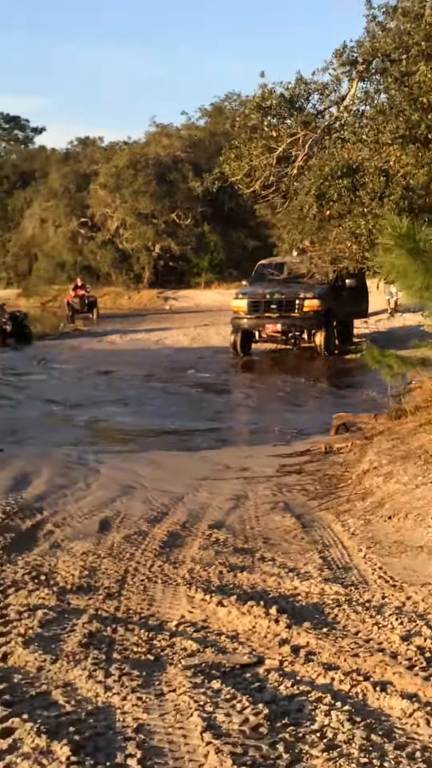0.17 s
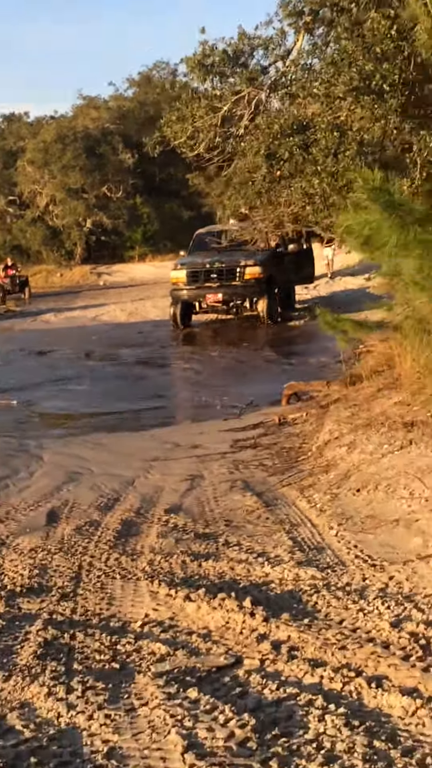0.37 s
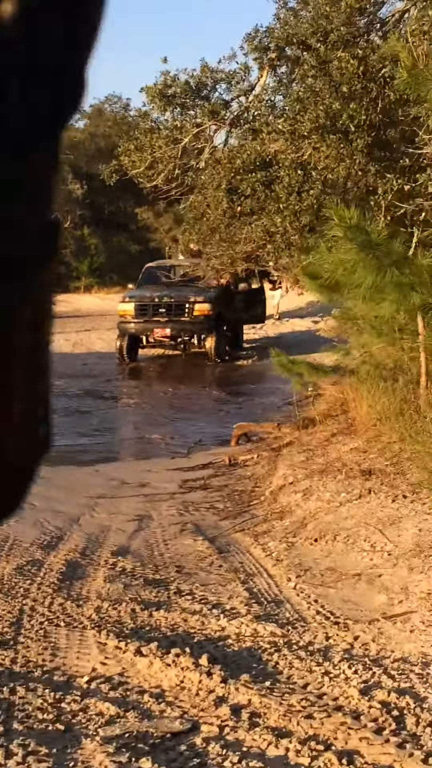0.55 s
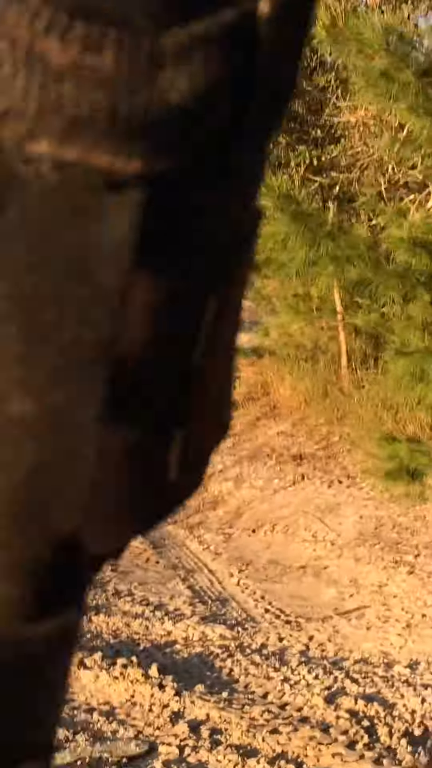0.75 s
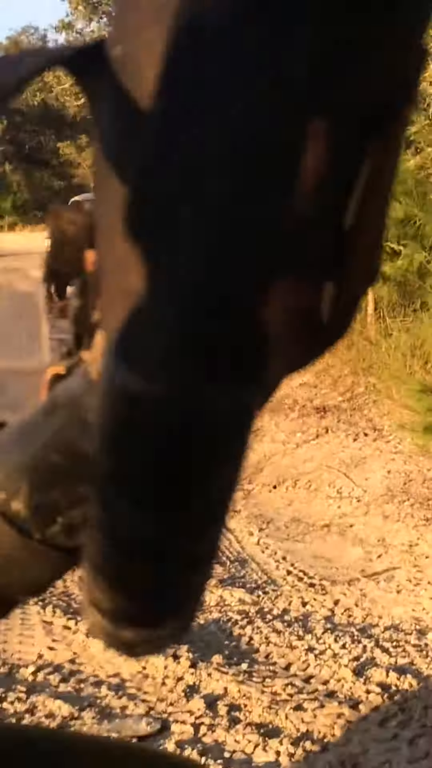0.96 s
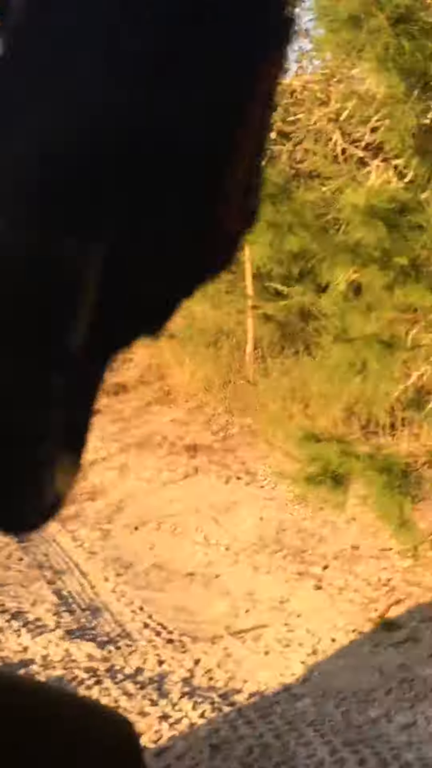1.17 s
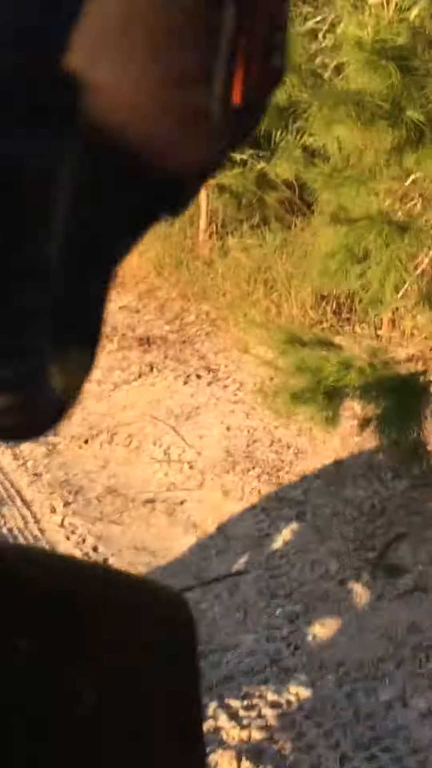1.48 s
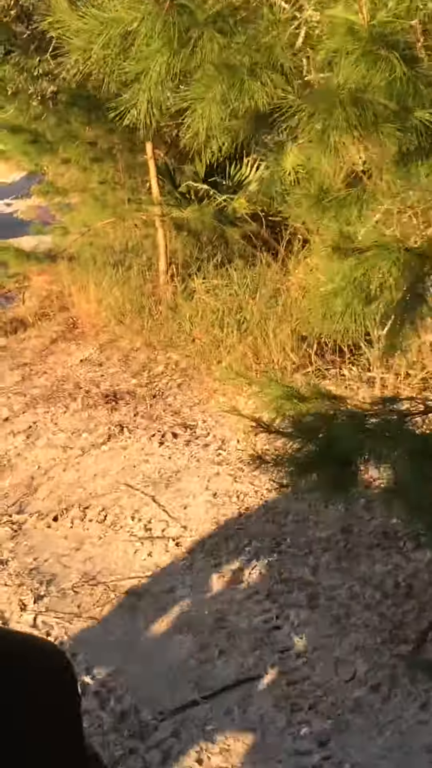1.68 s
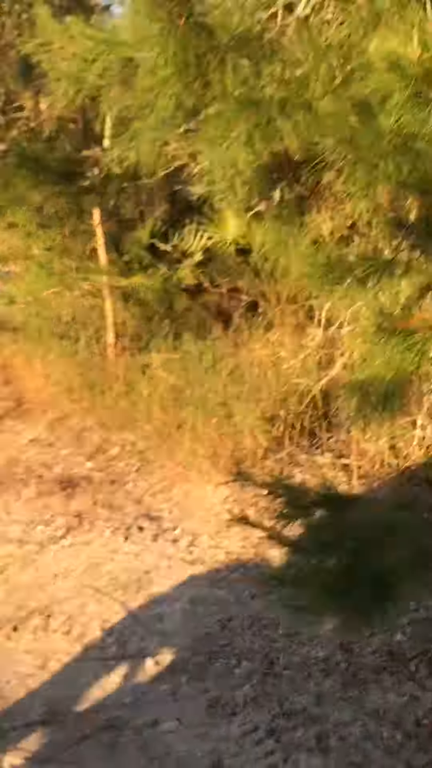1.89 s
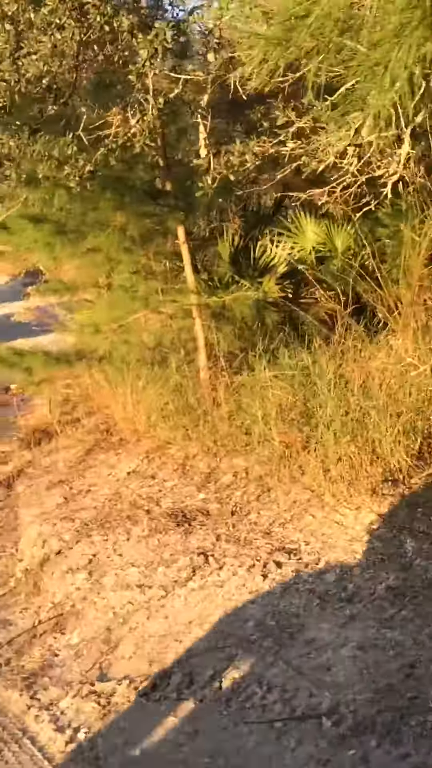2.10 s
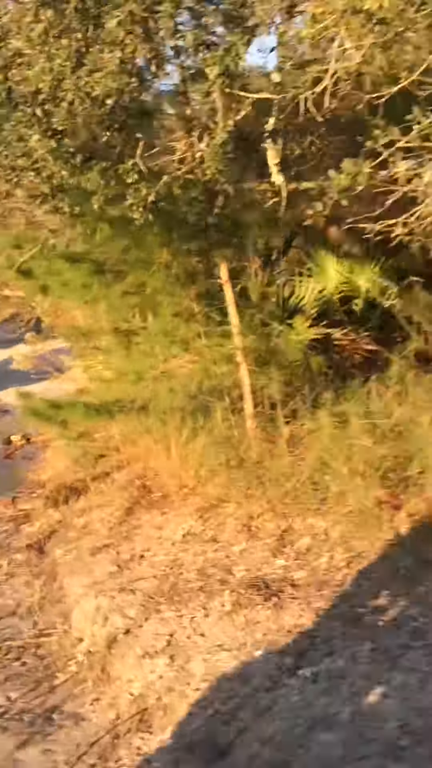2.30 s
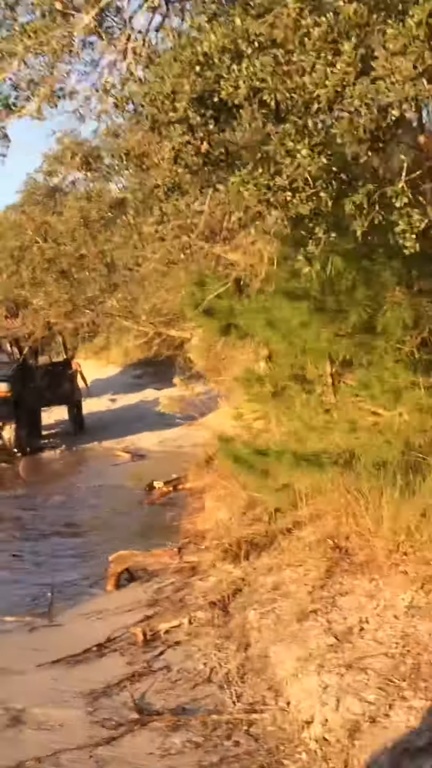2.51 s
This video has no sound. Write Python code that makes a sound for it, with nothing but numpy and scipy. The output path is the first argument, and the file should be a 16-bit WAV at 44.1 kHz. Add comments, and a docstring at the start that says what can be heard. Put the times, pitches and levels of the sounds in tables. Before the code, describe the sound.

A pickup truck engine swells, sags to idle, then revs hard.

```python
"""A muddy water hole, with a V8 pickup working through: two swells of throttle, a sag to idle, a hard rev.
Uneven firings boom in the exhaust pipe and turn raspy under load; a few heavy chugs lead into the rev.
The engine clatters and hisses in step with its cycle, over a low rumble of rolling.
Loose parts near the microphone rattle now and then."""
import sys
import numpy as np
from scipy import signal
from scipy.fft import rfft, irfft, next_fast_len
from scipy.io import wavfile
from scipy.ndimage import uniform_filter1d

SR = 44100
rng = np.random.default_rng(int(sys.argv[2]) if len(sys.argv) > 2 else 0)


def store_pcm(level_fs):
    """Save levels as 16-bit WAV."""
    pcm = np.round(np.clip(level_fs, -1, 1) * 32767).astype(np.int16)
    wavfile.write(sys.argv[1], SR, np.atleast_2d(pcm).T)


N = 116865

# Engine speed. Each row: time in seconds, four-stroke cycles per second.
ENGINE_SPEED = [(0, 28.3), (.1, 27.7), (.296, 23.8), (.482, 22.5), (.712, 18.4), (.828, 17.4), (.902, 18.6),
                (1.07, 26.1), (1.164, 26.9), (1.38, 22.8), (1.52, 21.2), (1.68, 18.2), (1.79, 16.5),
                (1.9, 18.5), (1.98, 29.3), (2.05, 31.2), (2.15, 33.25), (2.306, 33.8), (2.402, 33.7),
                (2.5, 32.5), (2.65, 30.3)]
# Loudness of the engine's rasp. Each row: time in seconds, level in dB.
RASP_LEVEL = [(0, -31), (.2, -35.5), (.45, -35.5), (.72, -40), (.9, -35.5), (1.08, -32.5), (1.3, -33.5),
              (1.55, -38), (1.78, -38.5), (1.92, -34), (1.99, -28), (2.06, -27.5), (2.14, -27), (2.27, -28),
              (2.45, -30), (2.65, -30.5)]
# Firings of the cylinder bank nearer the microphone. Each entry: place in the cycle in eighths.
NEAR_BANK = [0, 3, 5, 6]
# Spectrum of the clatter and the rushing gas. Each row: frequency in Hz, relative level in dB.
CLATTER_SPECTRUM = [(120, -27), (280, 7), (450, 2), (650, -0.5), (1100, -1.5), (1450, 0.5), (1650, -6),
                    (2000, -8.5), (2700, -15.5), (5000, -36), (15000, -58)]
PHASE_JITTER_RAD = .14
LOAD_STEADIES = .45  # share of the speed jitter and panel noise that full load takes away


def undb(db):
    """Decibels to gain."""
    return 10 ** (np.asarray(db) / 20)


def unit(x):
    """Scale to rms 1."""
    return x / np.sqrt(np.mean(x ** 2))


def curve(rows):
    """Join (seconds, value) rows with straight lines."""
    return np.interp(np.arange(N) / SR, *np.array(rows, float).T[:2])


def walk(rate):
    """Smooth random wander with a spread near 1."""
    hold = int(SR / rate)
    steps = np.repeat(rng.standard_normal(N // hold + 1), hold)
    return 1.3 * uniform_filter1d(uniform_filter1d(steps, hold), hold)[:N]


def colour(x, points):
    """Causal filter with the given (Hz, dB) response; output at rms 1."""
    size = 2 * next_fast_len(N)
    hz, db = np.array(points, float).T
    bins = np.maximum(np.arange(size // 2 + 1) * SR / size, 1)
    cepstrum = irfft(np.log(undb(np.interp(np.log(bins), np.log(hz), db))))
    cepstrum[1:size // 2] *= 2  # fold to minimum phase
    cepstrum[size // 2 + 1:] = 0
    return unit(irfft(rfft(x, size) * np.exp(rfft(cepstrum)))[:N])


def steady(x):
    """Even out slow level changes, so that a level curve sets the loudness."""
    return x / np.sqrt(uniform_filter1d(x ** 2, size=SR // 6) + 1e-9)


def ring(x, rings):
    """Excite (Hz, width in Hz, dB) resonances; output at rms 1."""
    return unit(sum(undb(db) * unit(signal.lfilter(*signal.iirpeak(hz, hz / width, fs=SR), x))
                    for hz, width, db in rings))


def strike(start, db, decay, rise=.0023):
    """Envelope of a quick rise and an exponential fall, times in seconds."""
    age = np.maximum(np.arange(N) / SR - start, 0)
    return undb(db) * np.minimum(age / rise, 1) * np.exp(-np.maximum(age - rise, 0) / decay)


def chassis(bump_s=1.668, bump_hz=95, decay_s=.005):
    """One dull bump over the low rumble of rolling."""
    age = np.maximum(np.arange(N) / SR - bump_s, 0)
    bump = -np.sin(2 * np.pi * bump_hz * age) * age / decay_s * np.exp(1 - age / decay_s)
    rumble = colour(rng.standard_normal(N),
                    [(10, -28), (25, 1), (50, -19), (120, 11), (300, -21), (2000, -93)])
    return undb(-9) * bump + undb(-28) * rumble


def rattles():
    """Loose parts jingle near the microphone, with one clank as the engine takes the load."""
    # The jingles. Each row: start in seconds, level in dB, decay in seconds.
    hits = [(.003, -40.5, 0.021), (.085, -40.5, 0.018), (.781, -41, 0.01), (.805, -43, .02),
            (.864, -45.5, 0.012), (0.904, -43.5, 0.074), (1.621, -43.5, 0.043), (1.644, -44, 0.035),
            (1.672, -36.5, 0.014), (2.067, -34, .03), (2.165, -35, .012), (2.6, -38, 0.011)]
    # Spectrum of their grit. Each row: frequency in Hz, relative level in dB.
    grit_spectrum = [(1500, -26), (3000, -3.5), (4000, -5), (4700, -6), (5400, -0.5), (5950, -2),
                     (6600, -4), (8000, -13), (9000, -10), (10000, -8), (11500, -22), (13500, -12),
                     (15000, -30)]
    # Resonances of the parts and of the clank. Each row: frequency in Hz, width in Hz, relative dB.
    part_rings = [(3997, 20, -9), (5456, 110, 0), (5970, 130, 1), (7173, 35, -3), (7730, 62, -6),
                  (8042, 40, -7)]
    clank_rings = [(465, 50, 4), (1065, 50, 3.5), (2450, 100, -5), (3900, 120, -9)]
    envelope = sum(strike(*hit) for hit in hits)
    grit = rng.standard_normal(N) * undb(1.3 * walk(700))
    jingle = undb(-6) * colour(grit, grit_spectrum) + undb(-4.5) * ring(grit, part_rings)
    clank = strike(start=1.96, db=-23.5, decay=.025, rise=.036) * ring(grit, clank_rings)
    return envelope * jingle + clank


def clink(start_s=1.672):
    """One loose metal part is struck squarely and rings out."""
    # Its modes. Each row: frequency in Hz, level in dB, decay in seconds.
    modes = [(3997, -43, .03), (5870, -37, .012), (6010, -36, .014)]
    t = np.arange(N) / SR
    return sum(strike(start_s, db, decay) * np.sin(2 * np.pi * hz * t) for hz, db, decay in modes)


def firings(cycle, far_bank_db=-9.5, scatter_db=1.5):
    """Eight pulses a cycle, the far bank weaker; also their strength, held between firings."""
    slot = np.floor(8 * cycle).astype(int)
    near = np.isin(np.arange(1024) % 8, NEAR_BANK)
    strength = undb(np.where(near, 0, far_bank_db) + scatter_db * rng.standard_normal(len(near)))[slot]
    return np.diff(slot, prepend=0) * strength, strength


def knocks(cycle, count=256):
    """A pattern of mechanical ticks that comes round every cycle, varying a little in strength."""
    strengths = rng.standard_normal(count)
    places = np.sort(rng.random(count))
    index = np.searchsorted(places, cycle % 1) % count
    onsets = np.diff(index, prepend=0) != 0
    return onsets * strengths[index] * (1 + .14 * rng.standard_normal(N))


def engine_hiss(gas_flow):
    """Treble noise that pulses lightly with the firings."""
    # Loudness of the hiss. Each row: time in seconds, relative level in dB.
    level = [(0, -39), (.13, -48), (.5, -49), (.7, -52), (.9, -47), (1.1, -47), (1.3, -48), (1.8, -48.5),
             (1.92, -48), (2.0, -40), (2.25, -39), (2.45, -41.5), (2.65, -42.5)]
    # Its spectrum. Each row: frequency in Hz, relative level in dB.
    spectrum = [(800, -15), (2500, 1), (3900, 1.5), (5000, -1.5), (6200, 1), (7600, -0.5), (8800, -6),
                (10000, -4.5), (12000, -10), (15000, -12)]
    hiss = colour((gas_flow + .6) * rng.standard_normal(N), spectrum)
    return hiss * undb(curve(level) - 1 + .5 * walk(30.9))


def body_panels(ticks, gas_flow, load):
    """Clatter and pulsing noise set the body panels ringing at a wavering level."""
    # Panel resonances. Each row: frequency in Hz, width in Hz, relative level in dB.
    resonances = [(293, 70, -2), (445, 48, -5), (778, 40, -7), (1077, 42, -4), (1210, 35, -6),
                  (1455, 130, 2), (1746, 50, -6)]
    drive = unit(ticks) + (1 - LOAD_STEADIES * load) * gas_flow * rng.standard_normal(N)
    return steady(ring(drive, resonances)) * undb(-6.5 + 2.5 * walk(12))


def engine_rasp(cycle, load):
    """Firings bark, parts clatter, gas rushes and hisses; load lifts bark and clatter over the gas."""
    # Spectrum of the bark. Each row: frequency in Hz, relative level in dB.
    bark_spectrum = [(120, -41), (260, 6.5), (440, 7.5), (600, 2.5), (780, 1.5), (920, -5.5), (1100, -2),
                     (1300, -4), (1470, -2), (1700, -3), (2000, -2), (2700, -19.5), (15000, -71)]
    pulses, strength = firings(cycle)
    bark = steady(colour(pulses * rng.standard_normal(N), bark_spectrum)) * undb(-9.5 + 4 * load)
    ticks = knocks(cycle)
    clatter = steady(colour(ticks, CLATTER_SPECTRUM)) * undb(-4.5 + 1.5 * load)
    since_firing = 8 * cycle % 1
    gas_flow = 2.7 + strength * np.exp(-since_firing / 1.8)
    gas = steady(colour(gas_flow * rng.standard_normal(N), CLATTER_SPECTRUM)) * undb(-1 - 3 * load)
    panels = body_panels(ticks, gas_flow, load)
    return undb(curve(RASP_LEVEL)) * (bark + clatter + gas + panels) + engine_hiss(gas_flow)


def rev_overtones(cycle, load, width_s=.1, waver_db=3):
    """Rough overtones that each swell and fade during the hard rev."""
    # The swells. Each row: multiple of the cycle rate, relative level in dB, peak time in seconds.
    swells = [(9, -2, 2.3), (11, -4, 2.11), (12, -6, 2.3), (13, -2.5, 2.25), (23, -4, 2.22), (32, -9, 2.22),
              (36, -4, 2.25), (43, -6.5, 2.24), (44, -5.5, 2.42), (45, -8, 2.46)]
    t = np.arange(N) / SR
    tones = 0
    for order, db, peak_s in swells:
        swell = undb(db + waver_db * walk(25.03)) * np.exp(-.5 * ((t - peak_s) / width_s) ** 2)
        tones += swell * np.cos(2 * np.pi * order * cycle + PHASE_JITTER_RAD * walk(50))
    return load * undb(curve(RASP_LEVEL)) * tones


def exhaust_chugs(width_s=.0097):
    """Heavy thumps from the pipe as the engine picks up from idle, each with a cough of gas."""
    # The thumps. Each row: peak time in seconds, pitch in Hz, level in dB.
    thumps = [(1.806, 91.5, -6), (1.86, 92, -5), (1.916, 102, -5), (1.962, 105, -11)]
    t = np.arange(N) / SR
    cough_ring = [(187, 112, 0)]
    cough = undb(-15.5) * ring(ring(rng.standard_normal(N), cough_ring), cough_ring)
    return sum(undb(db) * np.exp(-.5 * ((t - at) / width_s) ** 2)
               * (np.sin(2 * np.pi * hz * (t - at)) + cough) for at, hz, db in thumps)


def exhaust_boom(cycle, load, idle_hz=17, throb_depth=.42):
    """The tones of the uneven firing order and a burble of single puffs, both through the pipe."""
    # Exhaust tones. Each row: multiple of the cycle rate, relative dB at no load and at full load.
    orders = [(1, -29, -8), (2, -12, 4.5), (3, -5.5, -20.5), (4, -6, -10.5), (5, 1, 3), (6, -6, -1.5),
              (7, -22.5, -6.5), (8, -3.5, 4), (9, -9, -4), (10, -12, -4), (11, -8.5, -5), (12, -20, -13),
              (13, -19, -1.5), (14, -9, -1)]
    # The main note, order five, dips and swells in the rev. Each row: time in seconds, gain in dB.
    main_note = [(1.97, 0), (2.09, -8.5), (2.17, 3.5), (2.27, 2)]
    # Response of the pipe. Each row: frequency in Hz, relative gain in dB.
    pipe = [(20, -38), (35, -10.5), (50, -5.5), (68, -3.5), (90, -1), (115, 1.5), (135, 0), (152, -12),
            (170, -4), (184, -1.5), (203, -4.5), (218, -12), (245, -19.5), (290, -18), (340, -16.5),
            (450, -29.5), (3000, -97.5)]
    # Loudness of the boom. Each row: time in seconds, level in dB.
    level = [(0, -15.5), (.12, -14.5), (.3, -11.5), (.5, -12.5), (.7, -15.5), (.82, -14.5), (.92, -12.5),
             (1.15, -14), (1.4, -12.5), (1.49, -15), (1.55, -22), (1.76, -21), (1.91, -26), (1.96, -12.5),
             (2.1, -14), (2.3, -13), (2.65, -17.5)]
    tones = 0
    for order, light_db, full_db in orders:
        bank_phase = np.angle(np.exp(-2j * np.pi * order * np.array(NEAR_BANK) / 8).sum())
        unrest = 1 if order in (2, 5, 6, 8) else 2
        db = light_db + load * (full_db - light_db) + (order == 5) * curve(main_note)
        waver_db = 1.6 * unrest * walk(14)
        jitter = PHASE_JITTER_RAD * (unrest + (1 - load) * max(order - 8, 0) / 3) * walk(22.04)
        tones += undb(db + waver_db) * np.cos(2 * np.pi * order * cycle + bank_phase + jitter)
    puffs = firings(cycle)[0] * rng.standard_normal(N)
    burble = undb(-10.5 - load) * steady(colour(puffs, pipe))
    # One throb a cycle, deepest at idle.
    throb = 1 + throb_depth * idle_hz / curve(ENGINE_SPEED) * (1 - load) * np.cos(2 * np.pi * cycle)
    drone = undb(-.52) * steady(colour(tones * throb, pipe))
    return undb(curve(level)) * (drone + burble)


def scene():
    """The pickup at one microphone: speed and load drive the engine, with rattles and chassis added."""
    # The throttle. Each row: time in seconds, load from 0 to 1.
    throttle = [(0, 0.27), (.2, 0.18), (1.9, 0.01), (2.0, 0.96), (2.4, 0.99), (2.65, 0.78)]
    load = np.clip(curve(throttle), 0, 1)
    speed_jitter = .005 * (1 - LOAD_STEADIES * load) * walk(40)
    cycle = .15 + np.cumsum(curve(ENGINE_SPEED) * (1 + speed_jitter)) / SR  # running count of cycles
    engine = exhaust_boom(cycle, load) + engine_rasp(cycle, load) + rev_overtones(cycle, load)
    return (engine + exhaust_chugs() + rattles() + clink() + chassis())[None]


def record(dry):
    """The recorder rounds the highest peaks and cuts the top."""
    ceiling, top_hz = .76, 15300
    rounded = dry / (1 + (dry / ceiling) ** 6) ** (1 / 6)
    return signal.sosfilt(signal.ellip(10, .2, 80, top_hz, fs=SR, output="sos"), rounded)


dry = scene()
out = record(dry)
store_pcm(out)
```